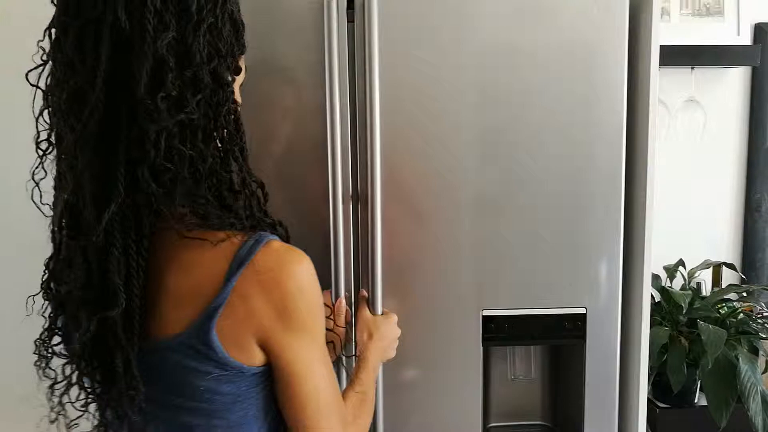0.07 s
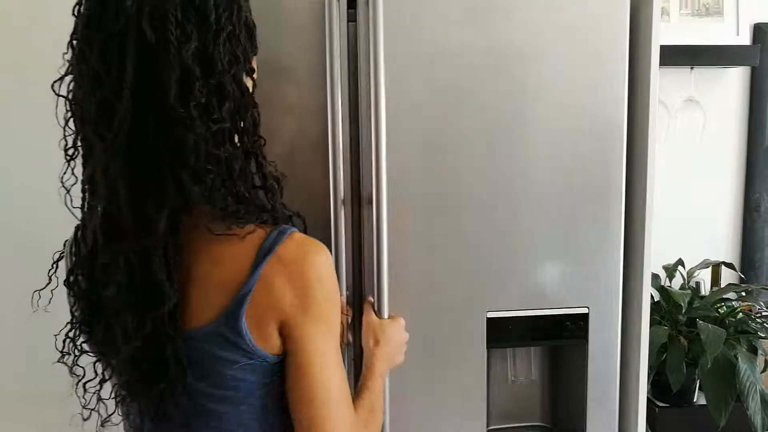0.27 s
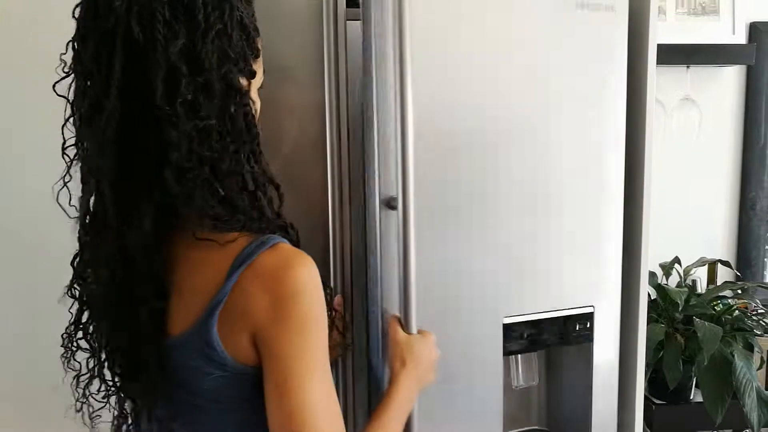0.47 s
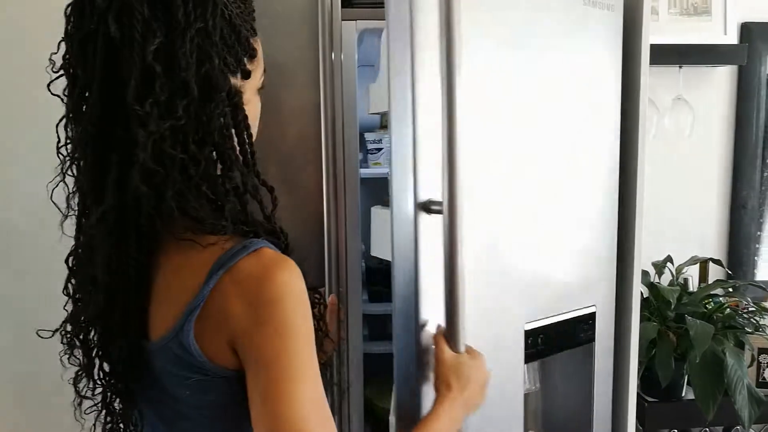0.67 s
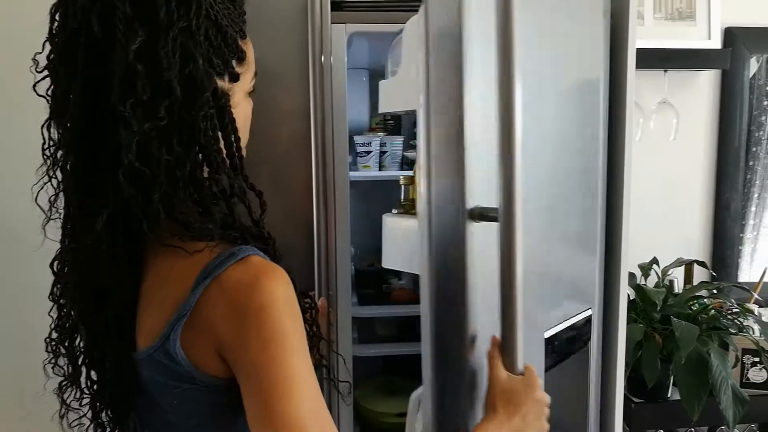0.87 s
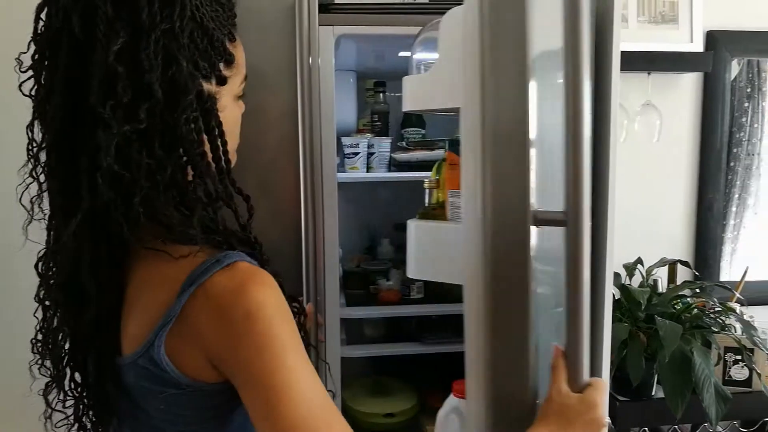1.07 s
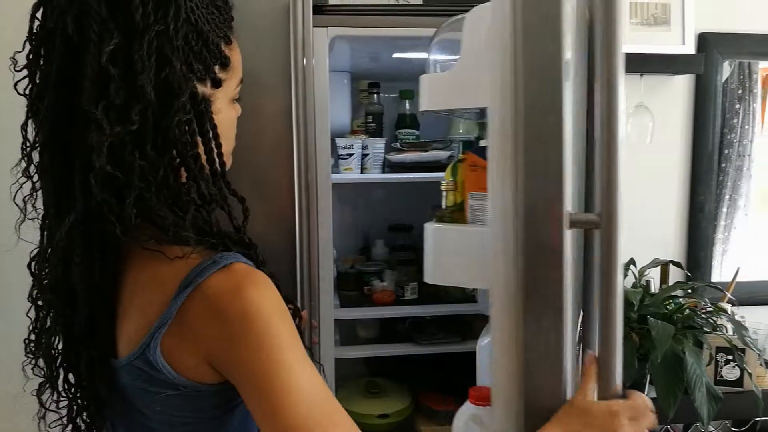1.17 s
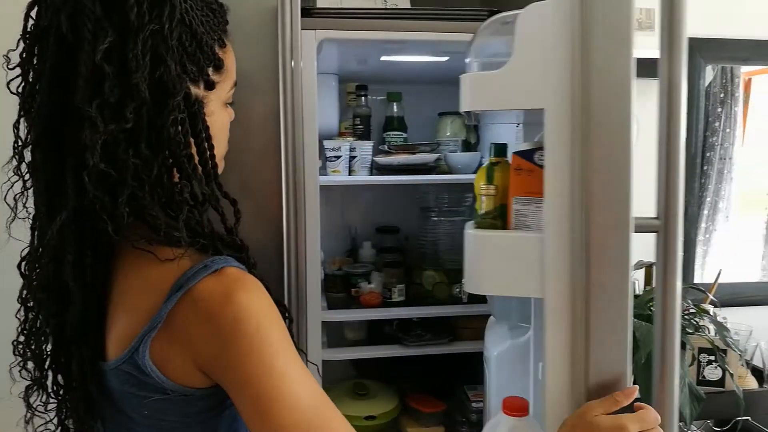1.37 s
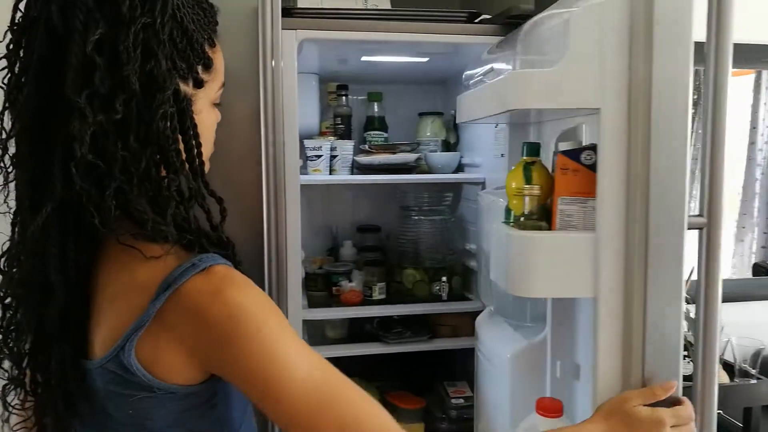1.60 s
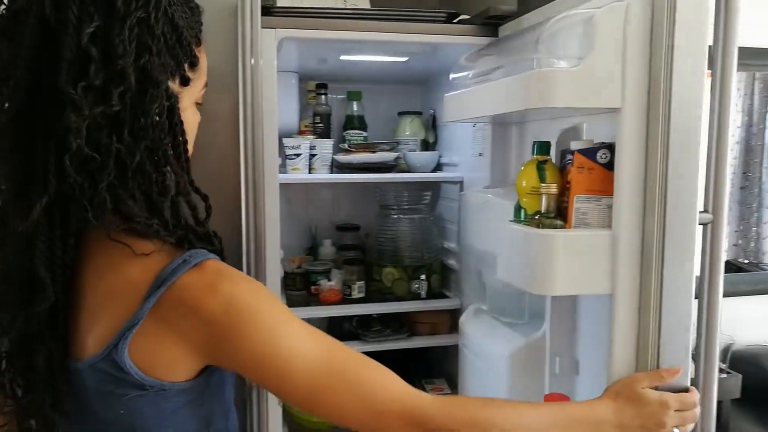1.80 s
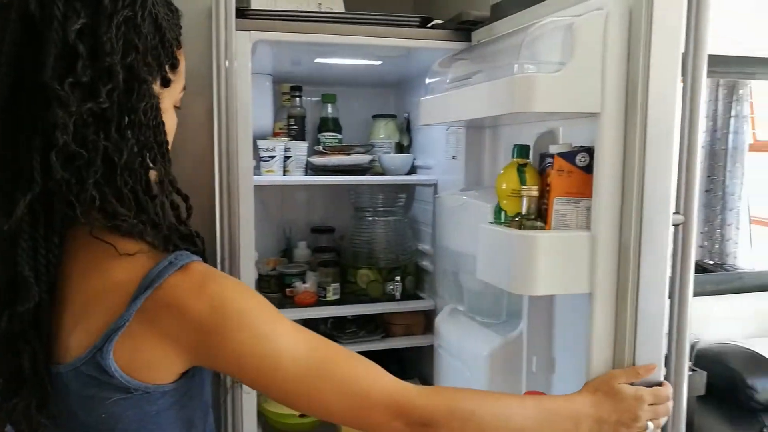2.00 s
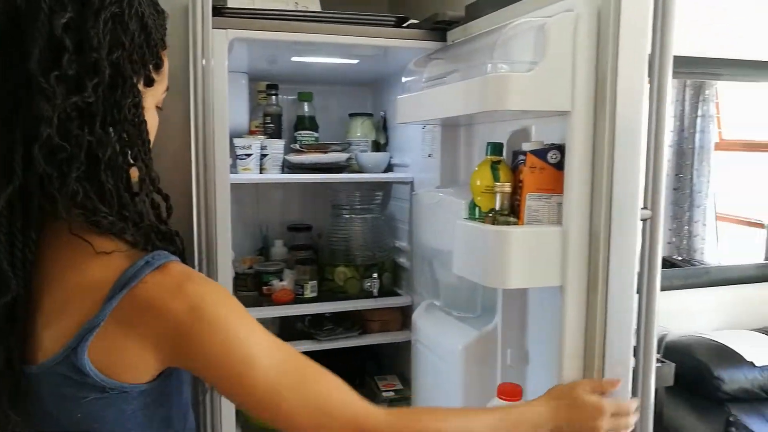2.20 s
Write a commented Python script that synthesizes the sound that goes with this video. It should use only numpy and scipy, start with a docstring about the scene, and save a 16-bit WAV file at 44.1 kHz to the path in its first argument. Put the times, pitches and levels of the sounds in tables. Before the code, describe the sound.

A refrigerator door pulls open with sharp glass clinks, then light ticks and knocks.

```python
"""Bottles and jars clink in a large refrigerator door as it is pulled open in a quiet kitchen.
The rubber seal creaks and lets go with a hollow puff, and the jolt makes the glass crack and ring.
Plastic racks tick and containers knock while the door swings with a low rumble.
The fridge hums underneath, and the hard walls echo every contact."""
import sys
import numpy as np
from scipy import signal
from scipy.fft import rfft, irfft
from scipy.io import wavfile

SR = 44100
rng = np.random.default_rng(int(sys.argv[2]) if len(sys.argv) > 2 else 0)


def to_wav(sig):
    """Store sig (one row per channel, or 1-D mono) as 16-bit WAV at the path in sys.argv[1].

    Samples outside -1..1 are clipped; the rate is SR.
    """
    pcm = np.clip(np.atleast_2d(sig), -1, 1) * 32767
    pcm = np.round(pcm).astype(np.int16)
    wavfile.write(sys.argv[1], SR, pcm.T)  # frames by channels


N = 99225
TIME = np.arange(N) / SR

# when the bottle and the jar are hit: (time [s], ring level [dB], crack level [dB])
BOTTLE_HITS = [(.2343, -31.5, -1.5), (.2377, -28, -0.5), (.2397, -39.5, 1), (.2555, -50, -12),
               (.3905, -49, -21)]
JAR_HITS = [(.3139, -32.5, -3), (.3202, -51, -10), (.3396, -57, -8.5), (.3485, -38, -12.5),
            (.371, -44, -21)]
# the notes each one rings with: (pitch [Hz], level [dB], time to fade by 60 dB [s])
BOTTLE_NOTES = [(2757, -19.5, 0.178), (3074, -14, 0.0503), (3400, 1, .028), (4260, 3.5, .04),
                (4238, -13.5, .12), (4940, -12.5, .08), (6850, -3, .04), (6862, -13.5, .1),
                (7290, -11, 0.075), (8838, -15, .09)]
JAR_NOTES = [(1630, -6, 0.098), (2680, -16, 0.24), (3159, -25, 0.32), (4180, 0, 0.13), (5060, -16, 0.081),
             (6300, 7, 0.077), (6450, -45, 0.154), (6250, -16, 0.106), (6400, -12, 0.051), (6500, -4, .04),
             (9695, -2.5, .14)]
# the tone of each one's crack: (frequency [Hz], level [dB])
BOTTLE_CRACK = [(90, -46.5), (420, -26.5), (1050, -13), (2250, -5), (3750, -2), (5450, -12), (7100, -3),
                (9600, -11.5), (15500, -17.5)]
JAR_CRACK = [(90, -44), (420, -14), (1050, -15.5), (1750, -6.5), (4150, 3), (5350, -2.5), (6650, 6),
             (8250, -10.5), (10100, -6), (15500, -14.5)]

def glass_clinks(hits, notes, crack_tone):
    """Jolted glass gives a sharp crack of sound, then rings. Returns the two separately."""
    cracks, rings = np.zeros((2, N))
    for start, ring_db, crack_db in hits:
        add(cracks, start, amp(crack_db) * contact(crack_tone, fade_s=.0017))
        add(rings, start, amp(ring_db) * ring(notes))
    return cracks, rings


# each tick: (time [s], level [dB], fade time [s], extra brightness [dB per octave])
TICKS = [(0.1133, -17, .005, -1), (0.1875, -17, 0.0026, 3), (0.2338, -10, 0.00096, -1.2),
         (0.3811, -25, 0.002, -2.5), (.3942, -22, 0.0059, -0.5), (.4638, -20, 0.0081, -2.5),
         (.5563, -16, 0.0051, -0.9), (0.5811, -19, .009, -3.7), (0.6015, -22.5, 0.0069, 1.5),
         (0.613, -17, 0.0061, -2.7), (0.714, -23, .007, -1), (0.7604, -18, 0.0028, 1.7),
         (0.7755, -22, 0.0058, -3.8), (0.799, -28, 0.0099, 7), (.8258, -25.5, 0.005, -1.5),
         (0.961, -24.5, 0.0017, 4.5)]
# the tone all ticks share: (frequency [Hz], level [dB])
TICK_TONE = [(90, -24.5), (320, -14.5), (1550, -8.5), (3250, 1.5), (4250, -3.5), (5350, -5.5), (7650, 0),
             (11200, -1), (14200, -7), (15900, -10.5)]

def rack_ticks():
    """The plastic racks give short, bright ticks as the door moves."""
    out = np.zeros(N)
    for start, db, fade_s, tilt in TICKS:
        tone = [(hz, tone_db + tilt * np.log2(hz)) for hz, tone_db in TICK_TONE]
        add(out, start, amp(db) * contact(tone, fade_s))
    return out


# each knock: (time [s], level [dB], fade time [s], container's pitch [Hz])
KNOCKS = [(0.1145, -26.5, 0.0089, 2540), (0.2407, -31, 0.0042, 1750), (0.4631, -20, 0.0056, 1660),
          (0.5827, -12.5, 0.0056, 2060), (0.6034, -15, .007, 1680), (0.6292, -12, 0.0042, 1385),
          (.6418, -16, 0.0047, 1280), (.6645, -42, 0.004, 1220), (0.7134, -26, 0.01, 1320),
          (0.7699, -26, .018, 1840), (.9609, -14.5, 0.0055, 2500), (0.9731, -19.5, 0.0039, 1050),
          (1.0103, -28, 0.0056, 1750), (1.8945, -37, 0.0024, 1060)]
# the tone of a knock: (frequency [multiple of the pitch], level [dB])
KNOCK_TONE = [(.04, -25.5), (.3, -11), (.6, -13), (1, -1), (1.35, -7), (2.1, -19), (3.8, -28), (9, -38)]
# when the rack is set ringing: (time [s], level [dB])
RACK_HITS = [(0.6296, -51), (0.641, -56), (.7145, -82), (.771, -63.5)]
# the rack's notes: (pitch [Hz], level [dB], time to fade by 60 dB [s])
RACK_NOTES = [(810, -8, 0.048), (1186.7, 1, 0.66), (1245, 3.5, .14), (1710, -3, 0.039)]

def container_knocks():
    """Containers knock dully, and a few of the knocks set the rack ringing."""
    out = np.zeros(N)
    for start, db, fade_s, pitch in KNOCKS:
        tone = [(multiple * pitch, tone_db) for multiple, tone_db in KNOCK_TONE]
        add(out, start, amp(db) * contact(tone, fade_s))
    for start, db in RACK_HITS:
        add(out, start, amp(db) * ring(RACK_NOTES))
    return out


# the last faint taps: (time [s], level [dB])
TAPS = [(1.8962, -57.5), (1.934, -60.5), (1.976, -66.5)]
# the notes of a tap: (pitch [Hz], level [dB], time to fade by 60 dB [s])
TAP_NOTES = [(715, -4.5, 0.044), (1007, -2, 0.065), (1082, -3.5, 0.061), (1275, -5, 0.053),
             (2190, -5, 0.024)]

def settling_taps():
    """Containers settle in the rack as the door stops."""
    out = np.zeros(N)
    for start, db in TAPS:
        add(out, start, amp(db) * ring(TAP_NOTES))
    return out


# each creak: (time [s], length [s], level [dB])
CREAKS = [(0.105, .05, -60.5), (0.1514, 0.046, -45), (0.194, 0.019, -59.5), (0.494, 0.028, -58)]
# where the seal rings: (pitch [Hz], width [Hz], level [dB])
SEAL_BANDS = [(1080, 250, -14.5), (1380, 67, 1), (1540, 62, -2.5), (2250, 240, -20.5), (3120, 350, -8.5)]

def seal_creaks(slips_per_s=830, spread_db=8.5):
    """The rubber sticks and slips, and each tiny slip makes the seal ring briefly."""
    out = np.zeros(N)
    for start, length_s, db in CREAKS:
        slipping = (rng.random(N) < slips_per_s / SR) & (TIME < length_s)
        strength = amp(spread_db * rng.standard_normal(N))
        creak = unit(resonate(slipping * strength + 1e-18, SEAL_BANDS))
        share = length_s * SR / N  # so the level counts the creak, not the silence after it
        add(out, start, amp(db) * creak * np.sqrt(share))
    return out


def air_puff(peak_s=.272, pitch_hz=283.3, db=-37, rise_s=.015, fall_s=.029):
    """A hollow note swells and dies as air enters through the opening seal."""
    t = TIME - peak_s
    swell = np.exp(np.minimum(t / rise_s, -t / fall_s))
    return amp(db) * swell * np.sin(2 * np.pi * pitch_hz * t)


# how loud the door's rumble and rubbing are: (time [s], level [dB])
RUMBLE_LEVEL = [(.1, -59.5), (.25, -50), (.43, -66), (.62, -54.5), (1.0, -58), (1.22, -54), (1.36, -64.5),
                (1.44, -54.5), (1.56, -56.5), (1.64, -54.5), (1.74, -62), (2.0, -70.5), (2.25, -65.5)]
RUB_LEVEL = [(.1, -50), (.25, -44.5), (.45, -51.5), (.8, -53), (.92, -55.5), (1.08, -62), (1.2, -73.5),
             (1.35, -66.5), (1.5, -66.5), (1.65, -70), (1.85, -73.5), (2.25, -78.5)]
# the tone of each: (frequency [Hz], level [dB])
RUMBLE_TONE = [(20, -10), (45, -3.5), (70, 3.5), (125, 4), (180, -0.5), (250, -7.5), (340, -11),
               (450, -45.5), (1000, -54)]
RUB_TONE = [(100, -10.5), (280, 6.5), (450, -7.5), (900, -1.5), (1450, -2), (2000, -1.5), (2700, -6.5),
            (4200, -20), (9000, -20.5), (16000, -33.5)]

def door_swing():
    """The moving door makes a low rumble and a soft rubbing noise."""
    rumble = level(RUMBLE_LEVEL) * stereo_noise(RUMBLE_TONE)
    rubbing = level(RUB_LEVEL) * stereo_noise(RUB_TONE)
    return rumble + rubbing


# each boom: (time [s], pitch [Hz], level [dB], half its length [s])
BOOMS = [(0.721, 145.8, -46.5, 0.027), (1.438, 122, -50, 0.03), (1.638, 134.3, -51, 0.021)]

def door_booms():
    """The door panel booms softly: low notes that swell and fade."""
    out = np.zeros(N)
    for peak_s, hz, db, half_s in BOOMS:
        swell = np.exp(-((TIME - peak_s) / half_s) ** 2)
        out += amp(db) * swell * np.sin(2 * np.pi * hz * TIME)
    return np.sqrt(2) * out


# how loud the hinge is: (time [s], level [dB])
HINGE_LEVEL = [(1.1, -94), (1.28, -68.5), (1.37, -69.5), (1.5, -64), (1.6, -67.5), (1.75, -98)]
# where the hinge rings: (pitch [Hz], width [Hz], level [dB])
HINGE_BANDS = [(1450, 90, 3), (2550, 300, -3.5), (3100, 195, -12.5)]

def hinge_rub():
    """Fine rubbing makes the hinge ring faintly."""
    friction = rng.standard_normal((2, N))
    return level(HINGE_LEVEL) * unit(resonate(friction, HINGE_BANDS))


# the notes in the hum: (pitch [Hz], level [dB])
HUM_NOTES = [(71, -68.5), (143, -58.5), (213, -72.5), (284, -70.5), (415, -74.5)]
# how the whole hum rises and falls: (time [s], level change [dB])
HUM_LEVEL = [(.1, -10), (.5, -10), (.72, 1.5), (1.02, 4), (1.25, -3), (1.7, -2.5), (1.95, -11.5),
             (2.25, -8.5)]

def fridge_hum(waver_db=.6, waver_points=20):
    """The running fridge hums with low, wavering notes, louder once the door is ajar."""
    waver_times = np.linspace(0, TIME[-1], waver_points)
    out = np.zeros(N)
    for hz, db in HUM_NOTES:
        waver = waver_db * np.interp(TIME, waver_times, rng.standard_normal(waver_points))
        out += amp(db + waver) * np.sin(2 * np.pi * (hz * TIME + rng.random()))
    return np.sqrt(2) * out * level(HUM_LEVEL)


# the tone of the still room: (frequency [Hz], level [dB])
AIR_TONE = [(30, -4.5), (300, 1.5), (500, -7.5), (1200, -4.5), (2500, -9), (5000, -21),
            (10000, -25), (16000, -35.5)]

def room_air(db=-63.5):
    """The quiet kitchen has a faint, steady hush."""
    return amp(db) * stereo_noise(AIR_TONE)


# how long the echo lasts: (frequency [Hz], time to fade by 60 dB [s])
ECHO_FADE = [(150, .42), (800, 0.73), (2000, 0.47), (5500, 0.38), (10000, .37), (16000, 0.26)]

def kitchen_echo(gap_s=.0029, build_s=.0028, early_db=6.5, early_s=.0069):
    """The walls answer a click with strong first bounces, then a tail that dies band by band."""
    noise = stereo_noise([(20, 0), (20000, 0)])
    edges = np.geomspace(60, 19000, 11)
    tail = np.zeros((2, N))
    for low, high in zip(edges, edges[1:]):
        band = signal.sosfilt(signal.butter(2, [low, high], "band", fs=SR, output="sos"), noise)
        tail += band * np.exp(-np.log(1000) * TIME / at_hz(ECHO_FADE, np.sqrt(low * high)))
        noise = np.roll(noise, SR // 7, axis=1)  # a new stretch of noise for the next band
    build_up = 1 - np.exp(-np.maximum(TIME - gap_s, 0) / build_s)
    early_boost = 1 + amp(early_db) * np.exp(-TIME / early_s)
    echo = tail * build_up * early_boost
    return echo[:, :SR] / np.linalg.norm(echo, axis=1, keepdims=True)


# how alike left and right are: (frequency [Hz], likeness [0 to 1])
LIKENESS = [(60, 1), (200, .95), (350, .8), (700, 0.21), (1500, .15), (4000, 0), (16000, 0.082)]

def stereo_noise(tone):
    """Noise with the given tone, alike on both sides only in the bass."""
    hz = np.fft.rfftfreq(N, 1 / SR)
    alike = at_hz(LIKENESS, hz)
    mid, side = rfft(rng.standard_normal((2, N)))
    left_right = np.sqrt(1 + alike) * mid + np.sqrt(1 - alike) * side * [[1], [-1]]
    return unit(irfft(amp(at_hz(tone, hz)) * left_right, N))


def contact(tone, fade_s, size=8192):
    """Two things touch: a dying flurry of tiny impacts, with a total energy of 1."""
    flurry = rng.standard_normal(size) * np.exp(-TIME[:size] / fade_s)
    burst = shape_tone(flurry, tone)
    return burst / np.linalg.norm(burst)


def ring(notes, size=30000):
    """One blow starts all of an object's notes, each at a slightly random strength."""
    t = TIME[:size]
    out = np.zeros(size)
    for k, (hz, db, fade_s) in enumerate(notes):
        strength = (-1) ** k * amp(db - .5 * rng.standard_normal())  # every other note is flipped
        out += strength * np.exp(-np.log(1000) * t / fade_s) * np.sin(2 * np.pi * hz * t)
    return out


def resonate(x, bands):
    """Keep the parts of a sound near the pitches where an object rings."""
    return sum(amp(db) * signal.lfilter(*signal.iirpeak(hz, hz / width, fs=SR), x)
               for hz, width, db in bands)


def shape_tone(x, tone, size=4096):
    """Give a sound a tone while keeping its start sharp (a minimum-phase filter)."""
    hz = abs(np.fft.fftfreq(size, 1 / SR))
    log_gain = np.log(amp(at_hz(tone, hz)))
    spectrum = np.exp(np.conj(signal.hilbert(log_gain)))
    kernel = np.fft.ifft(spectrum).real[:size // 2]
    return signal.fftconvolve(x, kernel / np.linalg.norm(kernel))[:len(x)]


def place(x, echo, pan_db, lag_s, direct_db, echo_db):
    """Add the room's echo to the direct sound, which is pan_db louder and lag_s later on the left."""
    left = np.interp(TIME - lag_s, TIME, x) * amp(pan_db / 2)
    right = x * amp(-pan_db / 2)
    reflected = signal.fftconvolve(x[None], echo, axes=1)[:, :N]
    return amp(direct_db) * np.array([left, right]) + amp(echo_db) * reflected


def amp(db):
    """Turn decibels into a multiplier."""
    return 10 ** (np.asarray(db) / 20)


def unit(x):
    """Scale to an average (rms) level of 1."""
    return x / np.sqrt(np.mean(x ** 2) + 1e-20)


def level(rows):
    """Draw a volume curve through (time [s], level [dB]) rows."""
    return amp(np.interp(TIME, *np.transpose(rows)))


def at_hz(rows, hz):
    """Read between a table's rows, with octaves evenly spaced."""
    frequencies, values = np.transpose(rows)
    return np.interp(np.log(np.maximum(hz, 1)), np.log(frequencies), values)


def add(track, start_s, sound):
    """Mix a sound in at a time."""
    i = int(start_s * SR)
    track[i:i + len(sound)] += sound[:N - i]


def scene():
    """Clinks, ticks, knocks and creaks echo over the door's movement, the hum and the air."""
    echo = kitchen_echo()
    door = door_swing() + air_puff() + door_booms() + hinge_rub()
    bottle_crack, bottle_ring = glass_clinks(BOTTLE_HITS, BOTTLE_NOTES, BOTTLE_CRACK)
    jar_crack, jar_ring = glass_clinks(JAR_HITS, JAR_NOTES, JAR_CRACK)
    background = fridge_hum() + room_air()
    ticks = rack_ticks()
    knocks = container_knocks() + settling_taps()
    return (place(bottle_crack, echo, pan_db=1, lag_s=.0003, direct_db=-3, echo_db=-.5)
            + place(bottle_ring, echo, pan_db=12, lag_s=.00025, direct_db=7.5, echo_db=-9)
            + place(jar_crack, echo, pan_db=6, lag_s=.00011, direct_db=-1.5, echo_db=1)
            + place(jar_ring, echo, pan_db=0, lag_s=.00002, direct_db=-2, echo_db=-14)
            + place(ticks, echo, pan_db=-1, lag_s=.00002, direct_db=-1, echo_db=3.5)
            + place(knocks, echo, pan_db=14, lag_s=.00016, direct_db=-2.5, echo_db=1.46)
            + place(seal_creaks(), echo, pan_db=.8, lag_s=.00008, direct_db=2.5, echo_db=0)
            + door + background)


def record(dry):
    """The sound starts suddenly after a short silence, and the highest treble is cut."""
    start_s, cutoff_hz = .094, 15750
    treble_cut = signal.ellip(10, .2, 60, cutoff_hz, fs=SR, output="sos")
    return signal.sosfilt(treble_cut, dry * (TIME > start_s))


dry = scene()
out = record(dry)
to_wav(out)
```